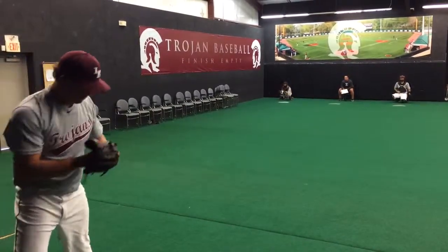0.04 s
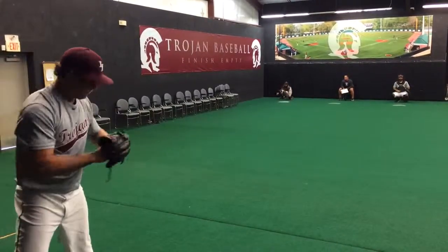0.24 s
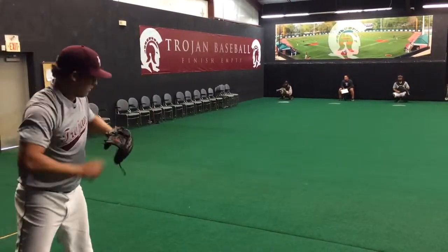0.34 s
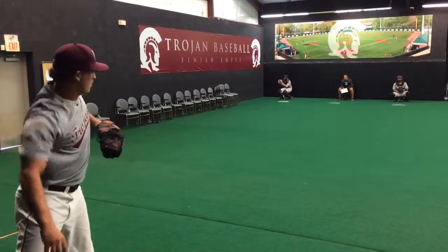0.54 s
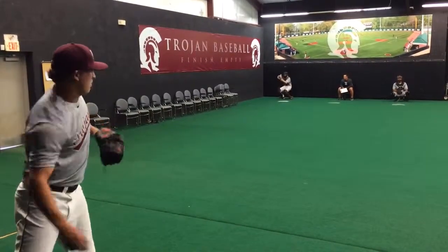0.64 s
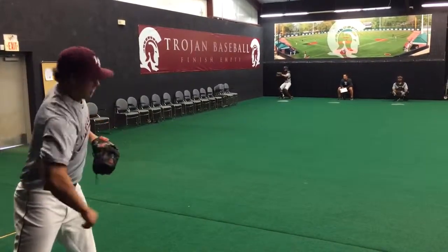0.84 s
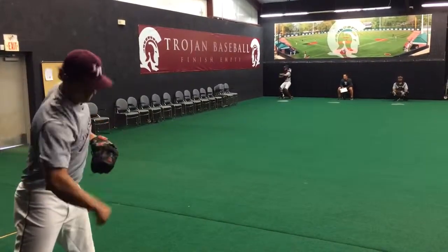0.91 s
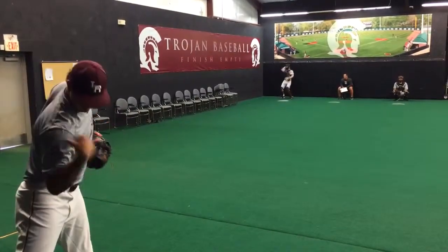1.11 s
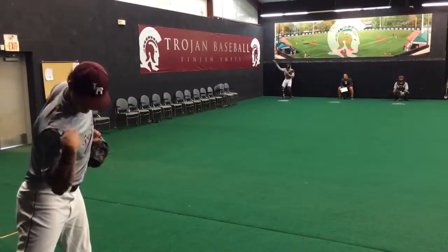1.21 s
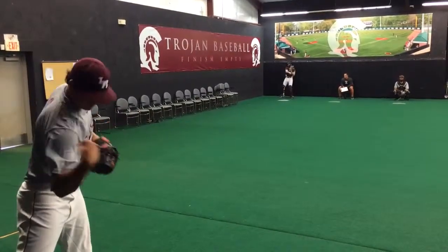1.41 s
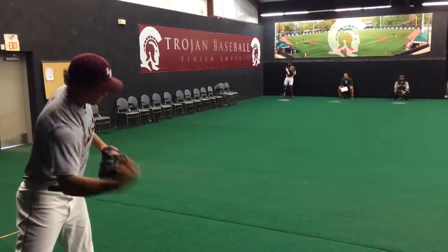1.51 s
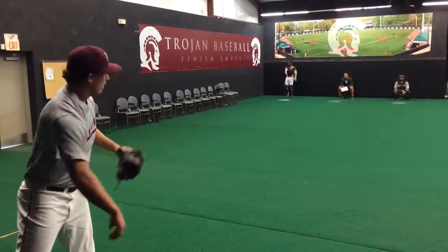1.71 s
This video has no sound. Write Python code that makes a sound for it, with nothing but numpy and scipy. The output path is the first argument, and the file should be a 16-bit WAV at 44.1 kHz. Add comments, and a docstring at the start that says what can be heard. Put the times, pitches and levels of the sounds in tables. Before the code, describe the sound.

A baseball slaps hard into a leather glove, cracking and echoing through a large indoor hall.

```python
"""A long indoor practice hall with a turf floor: a ball slaps into a leather glove.
The slap is decaying sine modes (hollow pop) plus a noise burst (bright crack), repeated as filtered copies
for a dull floor bounce and end-wall slap-backs; a tail of about a second is decaying band noise.
The tail of an earlier catch is dying at the start. Ventilation rumble, hum and faint rustles are shaped noise."""
import sys
import numpy as np
from scipy import signal
from scipy.io import wavfile

SR = 44100
rng = np.random.default_rng(int(sys.argv[2]) if len(sys.argv) > 2 else 0)


def unload_wav(signal):
    """Save mono or channel-first audio to the path in sys.argv[1] as 16-bit WAV at rate SR, clipped to [-1, 1]."""
    wavfile.write(
        sys.argv[1],
        SR,
        np.round(np.clip(np.atleast_2d(signal).T, -1, 1) * 32767).astype(np.int16),
    )


N = 77175

# Colour of the reverberation. Each row: frequency in Hz, relative density in dB per Hz.
HALL_COLOUR = [(35, -42), (60, -12), (91, -12.5), (183, 0.5), (359, -8.5), (453, -5.5), (720, -6),
               (908, -4), (1200, -8), (1740, -10.5), (4310, -20), (8640, -27.5), (12800, -38), (15400, -48)]
# Decay time of the hall. Each row: frequency in Hz, t60 in seconds.
HALL_T60_S = [(80, 0.91), (250, 1.25), (700, 1.29), (2000, 1.16), (5000, 1.244), (9000, 0.9), (14000, .45)]
# Scattered echo clusters. Each row: start in seconds, level at 1 kHz in dB, tilt in dB per octave,
# hold in seconds, t60 after the hold in seconds.
ECHO_CLUSTERS = [(0.2428, -20, 0.15, 0.018, 0.14), (0.361, -32.5, 0, .015, 0.2),
                 (0.411, -33.5, -2.66, 0.018, 0.031), (0.473, -46, -0.5, 0.026, .03),
                 (0.567, -48.5, -3.5, 0.018, 0.13), (.6100, -45.5, -3, 0.024, .04),
                 (0.73, -55, -0.5, 0.017, .1)]
TAIL_START_S, TAIL_DB = 0.2412, -28
EARLIER_DB, EARLIER_TILT_DB_PER_OCT = -46.5, 0.6   # earlier catch's tail at time zero, at 1 kHz
# Colour of ventilation and hiss. Each row: frequency in Hz, relative density in dB per Hz.
AIR_COLOUR = [(15, -31), (25, -4.5), (104, -6), (147, -21), (198, -10.5), (239, -24.5), (281, -15),
              (330, -27.5), (469, -29.5), (824, -29.5), (1610, -34.5), (15400, -59.5)]
AIR_DB, AIR_PATCHY_DB, AIR_PATCHY_HZ = -46.5, 2.28, 6
# Swell of the low rumble. Each row: time in seconds, level in dB (only departures from the mean count).
RUMBLE_SWELL = [(0.0, -54), (0.116, -46), (0.184, -62.5), (0.442, -46.5), (0.472, -59), (0.686, -43),
                (0.73, -54), (1.106, -55), (1.296, -45), (1.51, -56.5), (1.734, -49), (1.75, -43)]
RUMBLE_TOP_HZ = 85
# Wavering hum lines. Each row: centre in Hz, width in Hz, level in dB.
HUM_LINES = [(99.9, 5.2, -56), (278.15, 4.64, -64), (479, 3.8, -70)]
# Faint rustles and scuffs. Each row: start in seconds, length in seconds, level in dB, centre in Hz,
# width in octaves.
RUSTLE_PUFFS = [(.052, .012, -60, 4000, 0.26), (0.875, 0.2, -59.5, 930, 1.07), (1.342, 0.054, -68, 7850, 1),
                (1.584, 0.036, -57, 1320, 0.13), (1.616, 0.054, -60, 1740, 0.7),
                (1.607, 0.047, -54.5, 167, 0.5), (1.672, 0.076, -65, 6030, 1.1)]
# Ringing modes of the glove pocket. Each row: frequency in Hz, relative level in dB, t60 in seconds.
GLOVE_MODES = [(209, -16.5, 0.032), (380.5, -13.5, 0.034), (635, -15.5, 0.015), (769, -12, .025),
               (974.4, -12, 0.041), (1454, -16, .025), (2010, -19.5, 0.018), (4500, -12.5, 0.0069),
               (8600, -12, 0.0046)]
CRACK_DB, CRACK_S, CRACK_LOW_HZ = -17, 0.0026, 2880
CONTACT_HZ, THIN_HZ = 1840, 118   # low-pass of soft contact on the low modes; high-pass of the blow
# Distinct arrivals of the slap. Each row: time in seconds, gain in dB, low-pass in Hz, high-pass in Hz.
SLAP_ARRIVALS = [(0.2381, -0.5, 15300, 80.7), (.2422, -0.5, 1560, 80), (.2475, -12.5, 3500, 150),
                 (0.252, -6, 4000, 280), (.2580, -7.5, 4000, 280), (.2610, -10, 3000, 300),
                 (0.3618, -15.5, 10000, 350), (.3660, -14.5, 1510, 350), (.4120, -18, 2000, 201),
                 (0.418, -18, 2500, 200), (.4270, -17, 1500, 200), (.4865, -30, 13900, 500),
                 (0.612, -35.5, 8000, 295)]
BAND_EDGES_HZ = 22 * 2 ** np.arange(0, 9.7, .4)
CUTOFF_HZ = 15900   # 60 dB down from here up


def amp(db):
    """Decibels to amplitude."""
    return 10 ** (np.asarray(db) / 20)


def rms_one(x):
    """Scale to rms 1."""
    return x / np.sqrt(np.mean(x ** 2) + 1e-20)


def at_hz(points, hz):
    """Interpolate a table over log frequency."""
    points_hz, values = np.array(points).T
    return np.interp(np.log(hz), np.log(points_hz), values)


def band(x, low_hz, high_hz):
    """Butterworth band-pass."""
    sos = signal.butter(2, [low_hz, min(high_hz, .45 * SR)], "band", fs=SR, output="sos")
    return signal.sosfilt(sos, x)


def drift(rate_hz):
    """Slow random wander, rms 1: noise through two equal poles at every 40th sample."""
    pole = np.exp(-2 * np.pi * rate_hz * 40 / SR)
    noise = rng.standard_normal(N // 40 + 2002)
    slow = signal.lfilter([1], [1, -2 * pole, pole * pole], noise)[2000:]   # drop the settling
    return np.interp(np.arange(N) / 40, np.arange(len(slow)), rms_one(slow))


def dying(start_s, t60_s, hold_s=0):
    """Zero, then 1 for the hold, then an exponential decay."""
    t = np.arange(N) / SR - start_s
    return (t >= 0) * amp(-60 * np.maximum(t - hold_s, 0) / t60_s)


def coloured(spectrum, envelope):
    """Noise bands, each shaped in time by envelope(hz); steady noise would have about rms 1."""
    white = rng.standard_normal((2, N))   # neighbouring bands take different noise
    centres_hz = np.sqrt(BAND_EDGES_HZ[1:] * BAND_EDGES_HZ[:-1])
    gains = amp(at_hz(spectrum, centres_hz))
    gains = gains / np.sqrt(np.sum(gains ** 2 * np.diff(BAND_EDGES_HZ)) / (SR / 2))
    out = np.zeros(N)
    for k, (hz, gain) in enumerate(zip(centres_hz, gains)):
        shaped = white[k % 2] * envelope(hz) + 1e-18
        out += gain * band(shaped, BAND_EDGES_HZ[k], BAND_EDGES_HZ[k + 1])
    return out


def reverberation():
    """Diffuse tails of both catches, dying at each band's own rate, with echo clusters on top."""
    def envelope(hz):
        octaves, t60_s = np.log2(hz / 1000), at_hz(HALL_T60_S, hz)
        earlier = amp(EARLIER_DB + EARLIER_TILT_DB_PER_OCT * octaves) * dying(0, t60_s)
        tail = amp(TAIL_DB) * dying(TAIL_START_S, t60_s)
        power = earlier ** 2 + tail ** 2
        for start_s, db, tilt_db, hold_s, cluster_t60_s in ECHO_CLUSTERS:
            cluster = amp(db + tilt_db * octaves) * dying(start_s, cluster_t60_s, hold_s)
            power = power + cluster ** 2
        return np.sqrt(power)
    return coloured(HALL_COLOUR, envelope)


def ventilation():
    """Air noise, each band wandering in level, the lowest also swelling and sinking."""
    time_s, db = np.transpose(RUMBLE_SWELL)
    swell_db = np.interp(np.arange(N) / SR, time_s, db - db.mean())

    def envelope(hz):
        return amp(swell_db * (hz < RUMBLE_TOP_HZ) + AIR_PATCHY_DB * drift(AIR_PATCHY_HZ))
    return amp(AIR_DB) * coloured(AIR_COLOUR, envelope)


def hum():
    """Very narrow noise bands, heard as wavering tones."""
    out = np.zeros(N)
    for hz, width_hz, db in HUM_LINES:
        noise = rng.standard_normal(N + SR)
        line = band(noise, hz - width_hz / 2, hz + width_hz / 2)[SR:]   # drop the filter's settling
        out += amp(db) * rms_one(line)
    return out


def rustles():
    """Short soft puffs of band noise."""
    out, t = np.zeros(N), np.arange(N) / SR
    for start_s, length_s, db, hz, octaves in RUSTLE_PUFFS:
        arch = np.sin(np.pi * np.clip((t - start_s) / length_s, 0, 1))
        shape = np.sqrt(arch.clip(0))
        half_width = 2 ** (octaves / 2)
        noise = band(rng.standard_normal(N), hz / half_width, hz * half_width)
        out += amp(db) * shape * rms_one(noise)
    return out


def slap():
    """One blow on the pocket's modes, the low ones dulled by soft contact, plus the snap of leather."""
    t = np.arange(SR // 8) / SR
    modes = [amp(db - 60 * t / t60_s) * np.sin(2 * np.pi * hz * t) for hz, db, t60_s in GLOVE_MODES]
    contact = signal.butter(2, CONTACT_HZ, fs=SR, output="sos")
    pop = signal.sosfilt(contact, sum(modes[:-2])) - sum(modes[-2:])   # top two: undulled, inverted
    burst = rng.standard_normal(len(t)) * (t < CRACK_S)
    crack = band(band(burst, CRACK_LOW_HZ, 11500), 1650, 13000)
    blow = pop + amp(CRACK_DB) * crack
    return signal.sosfilt(signal.butter(2, THIN_HZ, "high", fs=SR, output="sos"), blow)


def direct():
    """The same slap arrives straight and by bounces, each copy with its own gain and band-pass."""
    out, blow = np.zeros(N), slap()
    for time_s, db, dull_hz, thin_hz in SLAP_ARRIVALS:
        i = int(time_s * SR)
        out[i:i + len(blow)] += amp(db) * band(blow, thin_hz, dull_hz)
    return out


def scene():
    """Sum of all layers, one channel."""
    return (reverberation() + ventilation() + hum() + rustles() + direct())[None]


def record(dry):
    """Steep low-pass cuts the top."""
    return signal.sosfilt(signal.cheby2(12, 60, CUTOFF_HZ, fs=SR, output="sos"), dry)


dry = scene()
out = record(dry)
unload_wav(out)
```